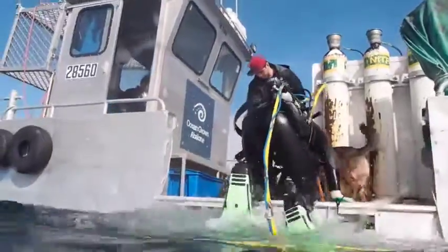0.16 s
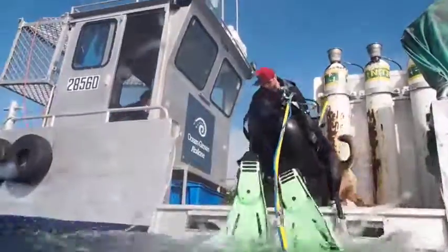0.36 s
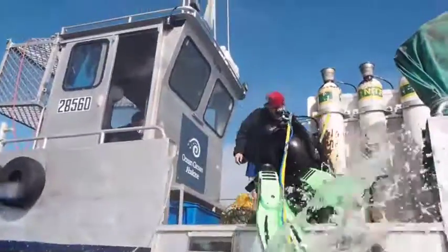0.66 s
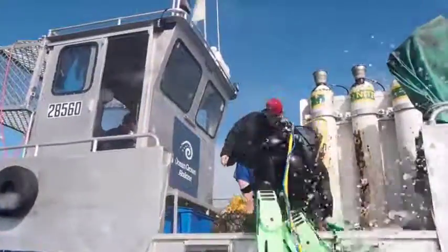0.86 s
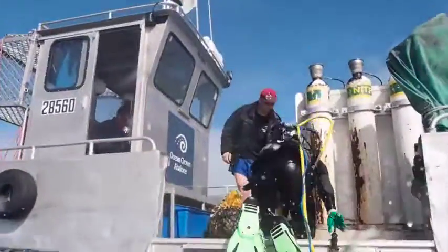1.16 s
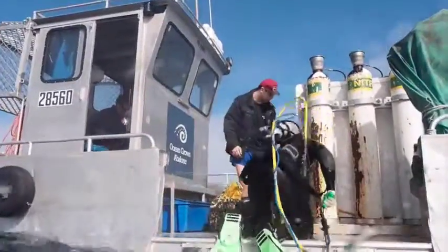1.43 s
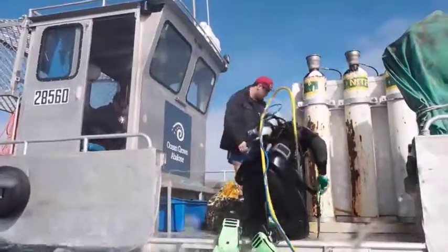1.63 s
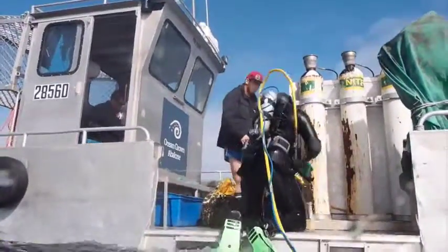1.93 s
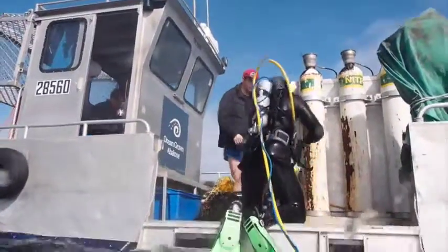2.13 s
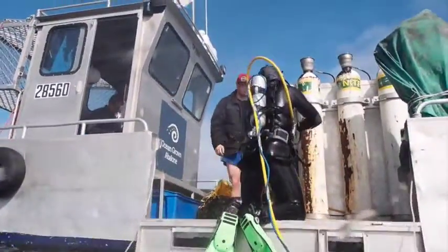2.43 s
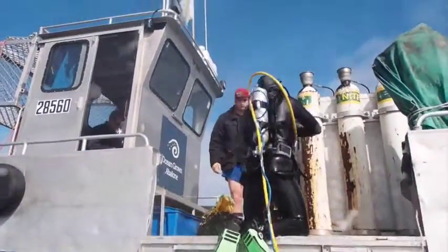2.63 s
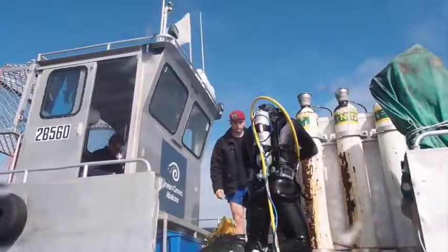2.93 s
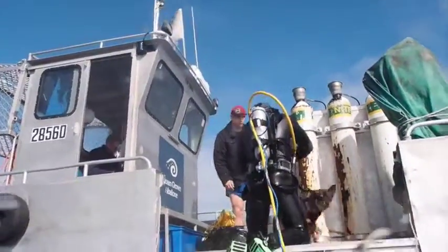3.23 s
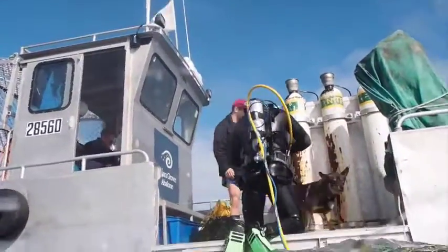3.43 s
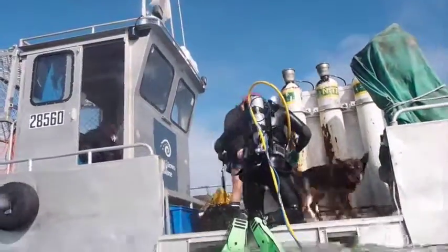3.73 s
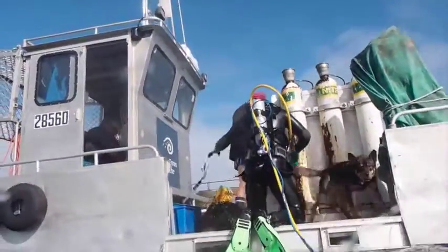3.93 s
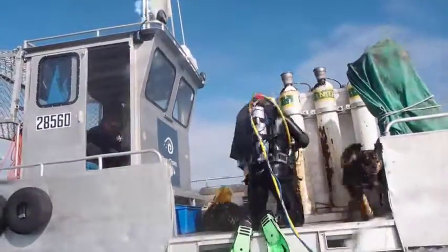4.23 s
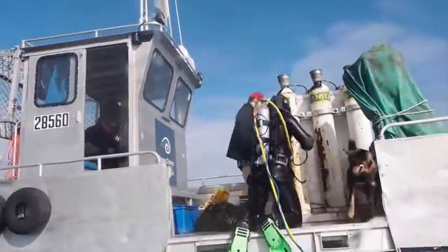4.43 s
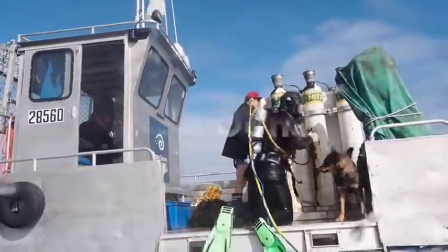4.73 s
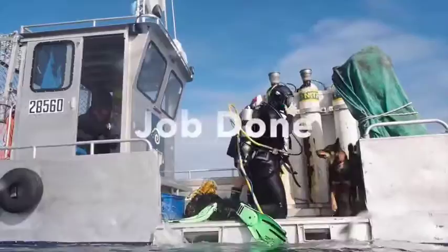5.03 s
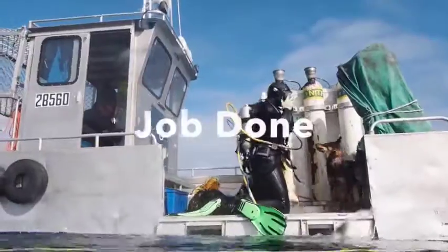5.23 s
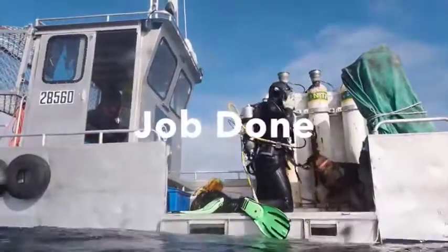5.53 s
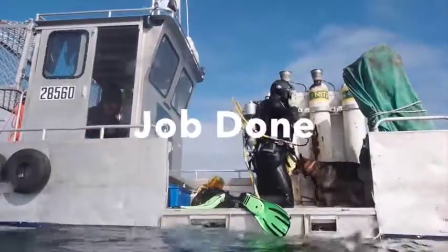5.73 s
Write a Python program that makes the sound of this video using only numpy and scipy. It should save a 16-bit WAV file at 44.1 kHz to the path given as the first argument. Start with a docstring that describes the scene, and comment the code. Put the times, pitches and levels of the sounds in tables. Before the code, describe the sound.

Wet exhaust coughs and chugs from an idling boat, with a few bubbly splashes, faint fizz and stray drips close by.

```python
"""A camera in a sealed housing floats beside an idling work boat; the sound rings through its walls.
From the start the wet exhaust coughs low, uneven pops over the engine's throb and a soft water hiss.
Foam crackles out of the microphone ports for 0.4 s, then tiny bubbles fizz faintly. Wavelets slap the
housing at 1.4, 1.6, 2.4 and 4.4 s, each a rush of bubbles and spray closing on an air pocket's gulp.
Stray drops plink in between, and the boat chugs on to the end."""
import sys
import numpy as np
from scipy import signal
from scipy.fft import rfft, irfft, next_fast_len
from scipy.io import wavfile
from scipy.ndimage import uniform_filter1d

SR = 44100
rng = np.random.default_rng(int(sys.argv[2]) if len(sys.argv) > 2 else 0)


def to_wav(s):
    """Save 16-bit WAV."""
    ch = np.atleast_2d(s).T  # columns
    pcm = np.round(np.clip(ch, -1, 1) * 32767)  # PCM
    wavfile.write(sys.argv[1], SR, pcm.astype(np.int16))


N = 258865
SHOT = 4096  # samples in a one-shot: a pop, bubble or tick

# Coughs of the wet exhaust: t/s, peak level/dB
EXHAUST_POPS = [(0.0001, -20.5), (0.058, -28), (0.121, -23), (0.159, -30), (0.524, -21), (0.558, -24.5),
                (0.638, -20), (0.692, -30), (0.867, -20.5), (0.925, -27), (1.158, -24), (1.193, -28.5),
                (1.218, -17.5), (1.26, -30.5), (1.51, -14), (1.56, -27.5), (1.573, -25), (1.827, -30),
                (2.029, -21), (2.094, -30.5), (2.257, -20), (2.293, -30), (2.544, -24), (2.596, -23),
                (2.661, -29), (2.927, -26.5), (2.957, -22.5), (2.994, -28), (3.068, -20.5), (3.128, -29.5),
                (3.299, -20.5), (3.362, -28.5), (3.418, -18.5), (3.47, -19.5), (3.528, -26), (3.586, -24),
                (3.628, -26), (3.647, -12.5), (3.695, -27.5), (3.937, -23), (3.995, -28), (4.163, -20.5),
                (4.229, -29.5), (4.288, -22.5), (4.329, -29.5), (4.346, -21.5), (4.396, -29), (4.459, -22),
                (4.516, -22.5), (4.563, -25.5), (4.806, -23), (4.864, -28), (5.043, -21), (5.097, -27),
                (5.153, -22), (5.204, -16.5), (5.262, -28), (5.327, -16.5), (5.397, -28.5), (5.5523, -14),
                (5.597, -30), (5.672, -22.5), (5.728, -29)]
# Wavelets hitting the housing:
# t/s, length/s, bubble ceiling/dB, spray ceiling/dB, air pocket peak/dB, air pocket f/Hz
WAVELET_SLAPS = [(1.396, 0.072, -26, -35, -22.5, 458.4), (1.597, 0.048, -31.5, -56, -41, 450),
                 (2.426, .075, -31, -42.5, -21, 475), (4.406, .093, -41, -50, -25, 434)]


def exhaust():
    """Each cough is a gas slug swelling and collapsing; big ones last longer and thump deeper."""
    out, t = np.zeros((2, N)), np.arange(SHOT) / SR
    path = housing(SHOT, order=1) * resonance(SHOT, hz=281.6, width_hz=87.0)
    for s, db in EXHAUST_POPS:
        jitter, split = rng.standard_normal(2)
        push_s = np.clip(0.00089 + .00002 * (db + 11) + .00005 * jitter, .0002, .003)
        x = t / push_s - 2.5
        push = x * np.exp(-.5 * x ** 2)
        push += 0.16 * split * np.roll(push, int(0.01175 * SR))  # the slug breaks: a weaker push follows
        place(out, s, stereo(rfft(push), 0, path, alike=0.076), db)
    return out


def splashes():
    """Bubbles chirp upward with a bright tick; each slap ends in an air pocket that sinks in pitch."""
    # Single drops and bubbles: t/s, peak level/dB, f/Hz, tick peak level/dB
    drops = [(0.772, -42.5, 2060, -67), (1.112, -36, 995, -75), (1.2502, -38, 2180, -44.5),
             (1.312, -50, 4140, -57), (1.382, -37, 940, -60), (1.4004, -26.5, 1976, -28),
             (1.407, -24, 3210, -44), (1.4147, -24, 3110, -46), (1.426, -24.5, 1060, -51),
             (1.4484, -21.5, 1123, -37), (1.493, -32, 3400, -50), (1.5115, -39, 2650, -38.5),
             (1.5165, -33, 3320, -42), (1.518, -21.5, 930, -40), (1.5394, -42, 2470, -59),
             (1.558, -47, 2220, -49), (1.5828, -60, 3900, -48), (1.599, -40, 3370, -64),
             (1.603, -23, 1130, -63), (1.6121, -19.5, 1740, -53), (1.6526, -23.5, 2090, -72),
             (1.6905, -44, 3180, -42.5), (1.724, -43, 3290, -59), (1.797, -49, 3380, -75),
             (1.845, -47.5, 2400, -74), (1.974, -54, 3500, -66), (2.0248, -59, 5300, -66),
             (2.4462, -17, 2550, -40), (2.47, -32, 3630, -62), (2.494, -23.5, 1090, -59),
             (2.54, -45, 2210, -60), (2.545, -35.5, 4590, -68), (2.7836, -52, 2400, -59),
             (3.7968, -47, 2710, -61), (4.1685, -45.5, 1710, -64), (4.4392, -40, 3170, -47),
             (4.445, -32.5, 674, -65), (4.451, -30.5, 2420, -67), (4.4658, -40, 1950, -44),
             (4.475, -37, 3460, -65), (4.4815, -34.5, 2036, -60), (4.482, -24, 3510, -49),
             (4.9846, -48, 2090, -73), (5.664, -47, 1530, -72)]
    out = np.zeros((2, N))
    path = housing(SHOT) + undb([[-11.], [-14.]])  # water right at the ports also gets past the walls
    for bubbles, tonal in (drops, 0.57), (slap_bubbles(), 0.16):
        for s, db, hz, tick_db in bubbles:
            decay_ms = 3.26 * (2000 / hz) ** 0.15  # lower bubbles ring longer
            bubble = bubble_burst(decay_ms, hz, width_ratio=0.5, tonal=tonal, glide=.025)
            place(out, s, stereo(*bubble, path), db)
            tick = bubble_burst(decay_ms=3.4, hz=8250 * rng.uniform(0.73, 1.265), width_ratio=0.35)
            place(out, s, stereo(*tick, path), tick_db)
    pocket_path = path + undb([[-5.], [-22.]])
    for s, length_s, _, _, pocket_db, hz in WAVELET_SLAPS:
        pocket = bubble_burst(decay_ms=12, hz=hz, width_ratio=0.45, tonal=0.8, glide=-0.205)
        place(out, s + length_s - .04, stereo(*pocket, pocket_path), pocket_db)
    return out


def slap_bubbles():
    """A slap is a rush of ever larger bubbles under fading spray: t/s, level/dB, f/Hz, tick level/dB."""
    count, start_hz, end_hz, spread_octaves = 26, 3165, 1150, .65
    scatter_db, soft_start_db, spray_fade_db = 5.5, 3.5, 14.5
    rows = []
    for s, length_s, db, spray_db, *_ in WAVELET_SLAPS:
        for k, (late, pitch, strength) in enumerate(rng.uniform(-1, 1, (count, 3))):
            progress = (k + .5 + .5 * late) / count
            hz = start_hz * (end_hz / start_hz) ** progress * 2 ** (spread_octaves * pitch)
            trim_db = scatter_db * (strength - 1) - soft_start_db * np.exp(-progress / 0.088)
            tick_db = spray_db + trim_db - spray_fade_db * progress
            rows.append((s + progress * length_s, db + trim_db, hz, tick_db))
    return rows


def bubble_burst(decay_ms, hz, width_ratio, tonal=0., glide=0.):
    """Two spectra: a gliding bubble tone blended with a puff of spray, and an unrelated stray puff."""
    age = np.arange(SHOT) / SR / (decay_ms / 1000)
    envelope = (1 - np.exp(-age / .3)) ** 2 * np.exp(-age)
    pitch_hz = hz * (1 + glide * np.tanh(age - 1))
    tone = np.sin(2 * np.pi * np.cumsum(pitch_hz) / SR + rng.uniform(0, 2 * np.pi))
    width_hz = width_ratio * hz
    spray = rng.standard_normal((2, SHOT)) * np.sqrt(SR / (8 * width_hz))  # in band, about as loud as tone
    spray[0] = tonal * tone + (1 - tonal) * spray[0]
    return rfft(spray * envelope) * resonance(SHOT, hz, width_hz) * resonance(SHOT, hz, 2 * width_hz) ** 2


def engine_rumble(walls, size):
    """Dark engine noise carried through the water, swelling after each firing."""
    # Fader ride of the rumble: t/s, level/dB
    rumble_levels = [(0.0, -42), (0.75, -44), (1.54, -40), (1.72, -45), (2.34, -42.5), (2.48, -45.5),
                     (2.78, -43.5), (3.48, -44), (3.73, -42.5), (4.22, -44), (5.25, -44), (5.69, -42.5)]
    firing_hz, first_firing_s, wander_db = 17.3, -0.0028, 1.7
    phase = ((np.arange(N) / SR - first_firing_s) * firing_hz) % 1
    throb = 0.49 + 4.278 * phase * np.exp(1 - phase / 0.096)
    throb *= undb(wander_db * wander(rate_hz=20))
    noise = rfft(rng.standard_normal((2, N)) * throb * rumble_duck(), size)
    dark = resonance(size, hz=464.0, width_hz=943.0) ** 2
    return unit_rms(stereo(*(noise * dark), walls)[:, :N]) * fader(rumble_levels)


def rumble_duck():
    """Gain that ducks the rumble between a loud cough and the next, if that follows closely."""
    loud_db, duck_db, delay_s, longest_s = -23.5, -10.5, 0.0327, .04
    db = np.zeros(N)
    for (s, pop_db), (next_s, _) in zip(EXHAUST_POPS, EXHAUST_POPS[1:]):
        if pop_db > loud_db and next_s - s < delay_s + longest_s:
            db[int((s + delay_s) * SR):int(next_s * SR)] = duck_db
    return undb(uniform_filter1d(db, size=220))


def foam():
    """Draining foam hisses through the walls and rings the wet ports, each mode flickering alone."""
    # Fader ride of the foam: t/s, level/dB
    foam_levels = [(0.0, -53.5), (0.142, -46.5), (0.278, -54.5), (0.298, -44), (0.328, -56.5),
                   (0.385, -66.5), (0.41, -90)]
    # Resonances of the wet ports: f/Hz, width before broadening/Hz, relative level/dB
    port_modes = [(1620, 79, -0.5), (1970, 70, 3), (2280, 130, -8.5), (3310, 270, -3.5), (3626, 39, -1.5),
                  (4500, 74, -11), (5300, 58, -7), (5863, 110, 2), (7620, 450, -11), (9200, 220, -23)]
    n = SR // 2
    hiss = rfft(rng.standard_normal((2, n))) * resonance(n, hz=4470.0, width_hz=11500.0) ** 2
    out = unit_rms(stereo(*hiss, housing(n))) * undb(-21.0)
    for hz, width_hz, db in port_modes:
        crackle = rng.standard_normal((2, n)) * undb(4.1 * wander(rate_hz=41.4)[:n])
        mid, side = irfft(rfft(crackle) * resonance(n, hz, 1.7 * width_hz) ** 2, n)
        out += undb(db) * np.array([mid + 1.6 * side, mid - 0.6 * side])
    return np.pad(unit_rms(out), ((0, 0), (0, N - n))) * fader(foam_levels)


def fizz(walls, size):
    """Tiny bubbles round the housing: bright, lightly grainy noise in its upper modes."""
    # Fader ride of the fizz: t/s, level/dB
    fizz_levels = [(0.4, -69.5), (0.72, -64), (1.35, -64), (1.6, -56.5), (1.7, -61), (2.11, -70),
                   (5.87, -70.5)]
    noise = rng.standard_normal((2, N))
    grain = undb(uniform_filter1d(17.0 * rng.standard_normal(N), size=200))
    bright = rfft(noise * grain, size) * resonance(size, hz=3270.0, width_hz=2560.0) ** 2
    gate = np.arange(N) > fizz_levels[0][0] * SR
    return unit_rms(stereo(*bright, walls, alike=0.17)[:, :N]) * fader(fizz_levels) * gate


def water_wash(walls, size):
    """A smooth bed of hiss from the open water."""
    noise = rng.standard_normal((2, N)) * undb(0.28 * wander(rate_hz=1.4))
    wash = rfft(noise, size) * resonance(size, hz=1460.0, width_hz=2000.0)
    return unit_rms(stereo(*wash, walls, alike=0.18)[:, :N]) * undb(-60.5)


def pressure_flutter(size):
    """Slow pressure swings, nearly the same at both ports."""
    noise = rfft(rng.standard_normal((2, N)), size)
    mid, side = irfft(noise * resonance(size, hz=66.3, width_hz=990.0) ** 2)[:, :N]
    return undb(-50.) * np.array([mid + .2 * side, mid - .2 * side])


def housing(size, order=2):
    """Mid and side response of the walls; water-borne sound meets each mode twice, a direct shove once."""
    # Wall modes: f/Hz, width/Hz (raised to at least 9% of f), mid level/dB, side level/dB
    wall_modes = [(145, 136, -4.5, -57.5), (280.4, 84, 7, -59.5), (383.6, 45.8, 8.5, -26),
                  (529.4, 38.5, -9, -21.5), (712, 490, -12, -12.5), (897, 121, -1.5, 5),
                  (934, 105, 5.5, -10), (995, 76.6, 6.5, -26), (1237, 344, -9, -19), (1586, 53, -5.5, 1.5),
                  (1990, 364, -4.5, -60), (2290, 133, -14, -5), (2975, 100, -21, -13.5),
                  (3428, 100, -15, -16.5), (3880, 83, -15, -16), (4920, 300, -18, -18),
                  (5820, 370, -17, -18.5), (7760, 370, -19, -18), (8440, 370, -15.5, -28),
                  (9070, 1800, -16.5, -11.5), (12100, 1330, -29, -33)]
    modes = [resonance(size, hz, max(width_hz, .09 * hz)) ** order for hz, width_hz, _, _ in wall_modes]
    return undb(np.array(wall_modes)[:, 2:].T) @ np.array(modes)


def stereo(near, stray, walls, alike=.7):
    """Left and right from the spectra of a sound and its stray part, which shakes only the side modes."""
    mid = irfft(walls[0] * near)
    side = irfft(walls[1] * (alike * near + np.sqrt(1 - alike ** 2) * stray))
    return np.array([mid + side, mid - side])


def resonance(size, hz, width_hz):
    """Band-pass response for a transform of this size, gain 1 at the centre."""
    f = np.fft.rfftfreq(size, 1 / SR)
    return 1j * f * width_hz / (hz ** 2 - f ** 2 + 1j * f * width_hz)


def wander(rate_hz):
    """Random steps smoothed twice into a drift; spread near 1."""
    hold = int(SR / rate_hz)
    steps = np.repeat(rng.standard_normal(N // hold + 1), hold)
    return 1.3 * uniform_filter1d(uniform_filter1d(steps, hold), hold)[:N]


def place(out, s, sound, peak_db):
    """Mix in a stereo one-shot at time s, its mid peaking at peak_db."""
    start = int(s * SR)
    n = min(sound.shape[1], N - start)
    out[:, start:start + n] += sound[:, :n] * undb(peak_db) / np.abs(sound.mean(0)).max()


def fader(points):
    """Gain for every sample from rows of t/s, level/dB."""
    return undb(np.interp(np.arange(N) / SR, *np.transpose(points)))


def unit_rms(x):
    """Scale a stereo sound so its mid has rms 1."""
    return x / np.sqrt(np.mean(x.mean(0) ** 2))


def undb(db):
    """dB to gain."""
    return 10 ** (np.asarray(db) / 20)


def scene():
    """Boat and water through the housing, over low flutter and the microphones' own hiss."""
    size = next_fast_len(N + SHOT, real=True) // 2 * 2
    walls = housing(size)
    mic_hiss = undb(-72) * rng.standard_normal((2, N))
    flutter = pressure_flutter(size)
    water = splashes() + water_wash(walls, size) + fizz(walls, size) + foam()
    return exhaust() + engine_rumble(walls, size) + water + flutter + mic_hiss


def record(dry):
    """The recorder cuts the top steeply above 15.8 kHz."""
    return signal.sosfilt(signal.ellip(10, .2, 70, 15800, fs=SR, output="sos"), dry)


dry = scene()
out = record(dry)
to_wav(out)
```